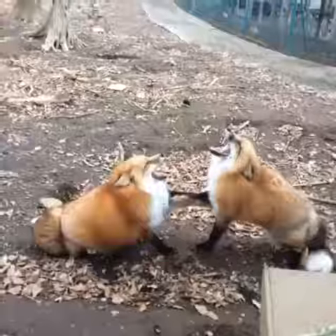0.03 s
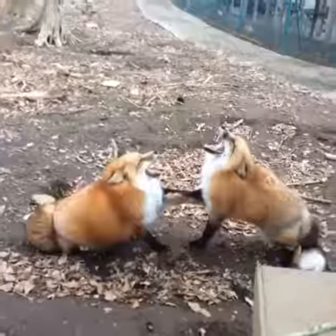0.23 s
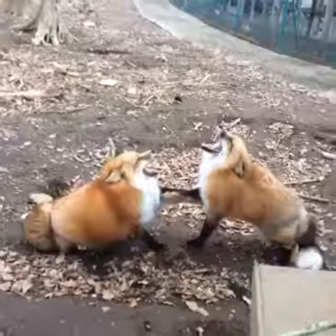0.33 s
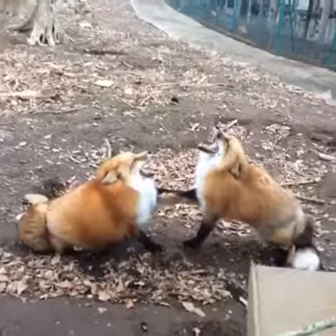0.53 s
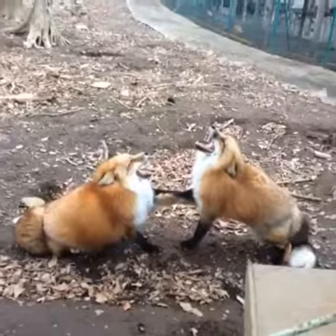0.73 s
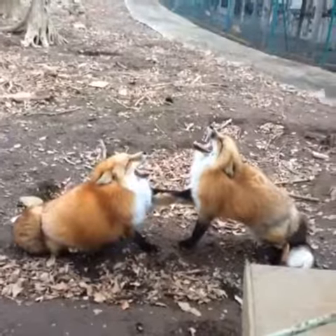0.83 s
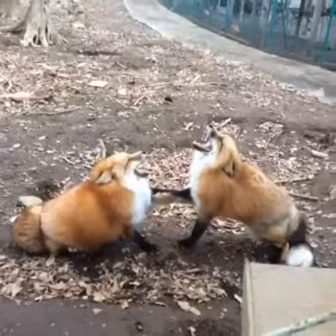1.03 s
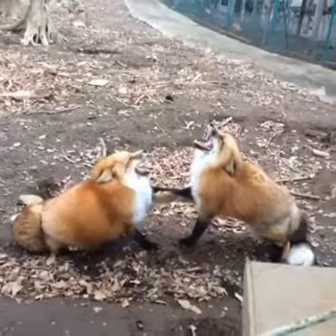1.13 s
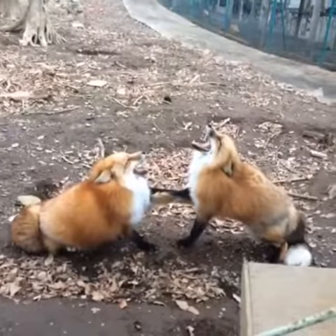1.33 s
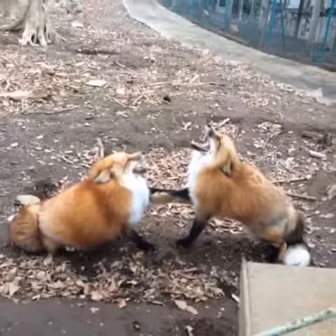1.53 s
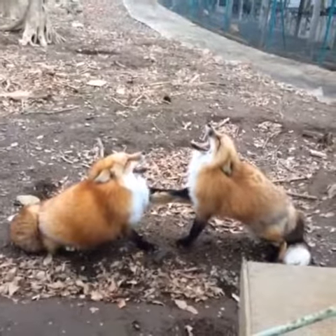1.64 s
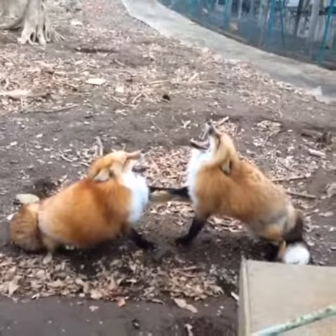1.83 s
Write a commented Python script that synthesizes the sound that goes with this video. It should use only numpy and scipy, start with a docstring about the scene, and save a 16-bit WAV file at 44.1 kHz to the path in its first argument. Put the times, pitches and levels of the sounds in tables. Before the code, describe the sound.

Two foxes scream, rasp and whine harshly at each other, close by outdoors.

```python
"""Two foxes quarrel face to face in an outdoor pen, close to a single microphone.
One rasps, forcing air through a wide open throat, while a wavering whine runs through it twice,
at times with a second tone. At the peaks of effort the voices break into harsh screams, and the
last whine ends in a growl. Jaws or dry twigs click and paws thud on the soil; fence and trees
give a short echo, and a low hum lies in the distance."""
import sys
import numpy as np
from scipy import signal
from scipy.fft import rfft, irfft, next_fast_len
from scipy.io import wavfile

SR = 44100
rng = np.random.default_rng(int(sys.argv[2]) if len(sys.argv) > 2 else 0)


def store_pcm(level_fs):
    """Save levels as 16-bit WAV."""
    pcm = np.round(np.clip(level_fs, -1, 1) * 32767).astype(np.int16)
    wavfile.write(sys.argv[1], SR, np.atleast_2d(pcm).T)


N = 83790
T = np.arange(N) / SR

# The rasping fox, close up: time_s, ring_db, air_db
RASP_LEVELS = [(.151, -45, -42), (.25, -36.5, -34.5), (.292, -32.5, -34.5), (.318, -40, -30),
               (.36, -39.5, -31), (.41, -39, -32.5), (.5, -33.5, -35.5), (.54, -45.5, -37.5),
               (.59, -30.5, -48), (.645, -36, -34), (.697, -32, -36.5), (.718, -46, -39.5), (.8, -36, -40),
               (.925, -33, -40), (.965, -35.5, -37.5), (1.0, -38.5, -40.5), (1.06, -33.5, -38),
               (1.1, -42, -41), (1.125, -36.5, -37.5), (1.2, -40, -45), (1.3, -73, -45), (1.36, -49, -83),
               (1.52, -67, -65)]
# Resonances of its open throat: centre_hz, width_hz, gain_db
THROAT_RESONANCES = [(869, 28, 4), (1098, 50, 2.5), (1288, 51, 3), (1442, 42, 2.5), (1570, 57, 3),
                     (1734, 98, 3), (1892, 186, 5), (2165, 126, -1), (2318, 277, -1.5), (5410, 440, -15)]
# Its rushing breath: frequency_hz, gain_db
BREATH_SPECTRUM = [(200, -67), (400, -14.5), (560, -5.5), (760, -5.5), (1000, 1.5), (1900, 1.5),
                   (2700, -12), (3600, -19.5), (4000, -18), (4600, -15), (6500, -18.5), (8300, -22.5),
                   (9500, -19), (11000, -29.5), (14000, -29)]
def rasp(flutter_hz=460, flutter_db=0.5):
    """Irregular puffs of air ring the fixed, steep-sided resonances of the open throat."""
    def throat(hz):
        return sum(amp(db) * resonance(hz, centre, width) for centre, width, db in THROAT_RESONANCES)
    puffs = amp(flutter_db * wobble(flutter_hz))
    ring = unit(filtered(puffs * rng.standard_normal(N), throat))
    breath = noise(BREATH_SPECTRUM, puffs)
    ring_db, air_db = curves(RASP_LEVELS)
    return sounding(RASP_LEVELS) * (amp(ring_db) * ring + amp(air_db) * breath)


# Two close whines, and four tones beside them: time_s, pitch_hz, fundamental_db, overtones_db
FIRST_WHINE = [(.151, 623, -33.5, -36.5), (.2, 555, -39, -41), (.26, 488, -38.5, -40.5),
               (.305, 596.3, -38.5, -44), (.337, 635, -36.5, -48), (.355, 560.3, -36, -46),
               (.385, 528, -36.5, -42), (.42, 444.2, -39.5, -62), (.47, 455, -43.5, -62),
               (.52, 483.7, -39.5, -37), (.555, 556.5, -37.5, -34), (.59, 481.3, -37.5, -37),
               (.62, 456, -45, -63), (.645, 415, -57, -57)]
LAST_WHINE = [(1.036, 719.5, -38.5, -53), (1.05, 569.6, -39, -27), (1.078, 456.7, -40, -36),
              (1.104, 436.3, -50, -52), (1.135, 458.4, -47.5, -35.5), (1.164, 507.3, -50, -37),
              (1.214, 522, -39, -31), (1.255, 491.6, -40.5, -35), (1.29, 447.4, -38.5, -37.5),
              (1.32, 491.6, -69, -35.5), (1.346, 521.8, -44, -40), (1.371, 537, -44, -34.5),
              (1.405, 502.3, -36, -37), (1.447, 476, -48.5, -33.5), (1.486, 545.2, -40.5, -38),
              (1.526, 558, -39.5, -36), (1.55, 525.4, -36.5, -36.5), (1.573, 488, -37, -42)]
SIDE_TONES = [
    [(.19, 826, -38, -57), (.225, 797, -41.5, -53), (.247, 736, -35.5, -57), (.275, 732, -43, -52)],
    [(.345, 880, -50, -57), (.388, 792, -31.5, -58), (.415, 666.5, -34.5, -53), (.44, 668, -32.5, -48),
     (.475, 684, -37.5, -58), (.505, 755, -43, -56)],
    [(.575, 596, -52, -44), (.61, 568, -40.5, -56), (.638, 557, -35, -42), (.655, 550, -74, -56)],
    [(1.17, 511, -49, -50), (1.24, 504.9, -63, -55), (1.31, 485.9, -43, -38.5), (1.39, 485, -46, -43),
     (1.46, 466.3, -35.5, -41.5), (1.51, 452.9, -41, -51), (1.558, 476.2, -36, -56), (1.578, 420, -41, -52)],
]
# The mouth's shape at a pitch of mouth_hz, and the air in the whine: frequency_hz, gain_db
MOUTH_RESPONSE = [(800, -21.5), (1100, 0), (1550, -13.5), (2000, -20), (2450, -16), (2850, -23),
                  (3300, -27), (4400, -37), (5100, -23.5), (5500, -27.5), (6000, -22), (7000, -35.5),
                  (9500, -37.5)]
WHINE_AIR_SPECTRUM = [(200, -42), (600, -41), (850, -13), (1150, 16.5), (1750, -23), (2500, 7), (3200, -7),
                      (4100, -13.5), (5200, -24), (6400, -5), (8000, -20), (9700, -19), (14000, -28)]
def whine(rows, mouth_hz=566, mouth_follow=0.34, bright_hz=520, crack_hz=498.4, strain_db=-32.5):
    """An unsteady tone with overtones shaped by the mouth; it squeals when high and cracks when low."""
    jitter_hz, shimmer_hz, flicker_hz = 210, 380, 38
    pitch, fundamental_db, overtones_db = curves(rows)
    phase = 2 * np.pi * np.cumsum(pitch * (1 + .009 * wobble(jitter_hz))) / SR
    dull_db = -.3 * np.maximum(bright_hz - pitch, 0)
    spacing = pitch * (mouth_hz / pitch) ** mouth_follow  # the resonances partly follow the pitch
    offsets = rng.uniform(0, 2 * np.pi, size=20)
    overtones = []
    for k in range(2, 20):
        flicker_db = 5 * wobble(flicker_hz) * (k > 2)
        gain = amp(along(MOUTH_RESPONSE, k * spacing) + dull_db * (k > 7) + flicker_db)
        hoarseness = .05 * k * wobble(shimmer_hz)
        overtones.append(gain * np.sin(k * phase + offsets[k] + hoarseness))
    second, *upper = overtones
    # As the pitch sags, a tone appears between the first two harmonics.
    crack = np.clip((crack_hz - pitch) / 30, 0, 1) * np.sin(1.5 * phase + wobble(jitter_hz))
    air = amp(-11) * noise(WHINE_AIR_SPECTRUM, 1 + .5 * np.cos(phase))
    # Above strain_db, extra effort goes mostly into the second harmonic.
    upper_gain = amp(-0.59 * np.maximum(overtones_db - strain_db, 0))
    edge = second + upper_gain * (sum(upper) + air) + amp(-9.5) * crack
    voice = amp(fundamental_db) * np.sin(phase) + amp(overtones_db) * edge
    shimmer = amp(wobble(shimmer_hz))
    return np.sqrt(2) * voice * shimmer * sounding(rows)


# Screams at the peaks of effort: start_s, length_s, body_db, hiss_db
SCREAMS = [(0.111, 0.08, -33.5, -35.5), (0.188, 0.045, -34, -37), (0.34, 0.036, -37.5, -35),
           (0.387, 0.059, -32.5, -55), (0.458, 0.1, -34.5, -72), (0.552, 0.072, -34, -68)]
# Their colour from the throat and from the teeth: frequency_hz, gain_db
SCREAM_BODY_SPECTRUM = [(200, -19), (350, -20), (480, -14), (700, 5), (1100, 1.5), (1450, 3.5), (1850, 2.5),
                        (2300, -17), (3000, -18), (6000, -21.5), (14000, -25.5)]
SCREAM_HISS_SPECTRUM = [(500, -32), (1600, -8), (2150, 4.5), (2480, -2), (2900, 3.5), (3400, 7),
                        (4000, -4.5), (4600, -1.5), (5300, -5.5), (5900, 1.5), (7000, -14), (8300, -16),
                        (9600, -20), (11500, -35), (13500, -23)]
def screams(attack_s=0.012, fall_db_per_s=356, flutter_hz=370, flutter_db=2):
    """The voice breaks into chaotic flutter: a throaty body and a hiss between the teeth."""
    flutter = amp(flutter_db * wobble(flutter_hz))
    body, hiss = np.zeros(N), np.zeros(N)
    for start, length, body_db, hiss_db in SCREAMS:
        attack = np.clip((T - start) / attack_s, 0, 1)
        envelope = attack * amp(-fall_db_per_s * np.maximum(T - start - length, 0))
        body = np.hypot(body, amp(body_db) * envelope)
        hiss = np.hypot(hiss, amp(hiss_db) * envelope)
    return body * noise(SCREAM_BODY_SPECTRUM, flutter) + hiss * noise(SCREAM_HISS_SPECTRUM, flutter)


# Squeals within the rasp and screams: start_s, end_s, start_hz, end_hz, level_db
SQUEALS = [(0.151, 0.184, 2545, 2348, -31.5), (0.154, 0.249, 2140, 2125, -38.5),
           (0.162, 0.343, 1339, 1281, -34.5), (0.265, 0.305, 1545, 1580, -29.5),
           (0.288, 0.32, 1166, 1220, -28.5), (0.543, 0.558, 1090, 1115, -36),
           (0.35, 0.396, 985.5, 912, -32), (0.371, 0.412, 1616, 1437, -35), (0.388, 0.417, 1270, 1325, -33),
           (0.409, 0.453, 1127, 1102, -28.5), (0.454, 0.55, 1460, 1452, -32.5),
           (0.559, 0.619, 1868, 1690, -32), (0.657, 0.712, 1447, 1457, -34.5),
           (0.753, 0.978, 880, 864, -50), (0.695, 0.983, 560, 575.5, -57.5),
           (0.768, 0.985, 1066, 1045, -48.5), (1.176, 1.32, 2445, 2444, -41.5)]
def squeals(flutter_hz=260, wander_hz=13, shimmer_db=2):
    """Thin fluttering tones glide and stand out of the rasp."""
    out = np.zeros(N)
    for start, end, start_hz, end_hz, db in SQUEALS:
        glide = [(start, start_hz), (end, end_hz)]
        pitch = curves(glide)[0] + wander_hz * wobble(flutter_hz)
        envelope = amp(db + shimmer_db * wobble(flutter_hz)) * sounding(glide)
        out += envelope * np.sin(2 * np.pi * np.cumsum(pitch) / SR)
    return out


# The growl that ends the last whine: time_s, level_db
GROWL_LEVELS = [(1.533, -37.5), (1.556, -33.5), (1.59, -33), (1.62, -40), (1.648, -50)]
# The growling throat: frequency_hz, gain_db
GROWL_SPECTRUM = [(280, -18), (620, 6), (1100, 0), (1850, -5.5), (2500, -17), (4800, -22), (5900, -16.5),
                  (7000, -24), (14000, -29.5)]
def growl(puff_hz=125, unevenness=.25, fall_db=16):
    """Slack vocal folds flap unevenly; every puff rings the throat and dies."""
    cycle = np.cumsum(puff_hz * np.exp(unevenness * wobble(puff_hz))) / SR % 1
    puffs = noise(GROWL_SPECTRUM, amp(-fall_db * cycle))
    return amp(curves(GROWL_LEVELS)[0]) * sounding(GROWL_LEVELS) * puffs


# Thin shrieks in the rasp: start_s, end_s, level_db
SHRIEKS = [(0.801, 0.962, -49.5), (1.101, 1.162, -47.5)]
def shriek(centre_hz=4540, width_hz=390):
    """As the lips draw back, air rings one narrow, high resonance of the mouth."""
    envelope = sum(amp(db) * sounding([[start], [end]]) for start, end, db in SHRIEKS)
    ring = filtered(rng.standard_normal(N), lambda hz: resonance(hz, centre_hz, width_hz))
    return envelope * unit(ring)


# Fine spray at the peak of the scream: time_s, level_db
SPIT_LEVELS = [(.34, -56.5), (.365, -47), (.5, -47.5)]
def spit():
    """A burst of very high hiss between the teeth."""
    return amp(curves(SPIT_LEVELS)[0]) * sounding(SPIT_LEVELS) * noise([(4000, -36), (9500, 2)])


# Clicks near the microphone: time_s, level_db, t60_s, ring_hz
SNAPS = [(1.012, -20.5, 0.0046, 2130), (1.0132, -30, 0.01, 3880), (1.0332, -26, 0.024, 1720),
         (1.0366, -28, 0.011, 4250), (1.6545, -42, 0.0054, 2920), (1.891, -37.5, 0.01, 2200),
         (1.8935, -36.5, 0.01, 3870)]
# Their noisy crack: frequency_hz, gain_db
CRACK_SPECTRUM = [(300, -12), (900, 1.5), (1700, 0), (2900, -4), (4300, -3.5), (5500, -13), (9000, -25),
                  (14000, -42)]
def snaps(bass_cut_hz=430):
    """Jaws or dry twigs crack and ring briefly, too small to radiate bass."""
    crack = amp(-1.5) * noise(CRACK_SPECTRUM)
    clicks = np.zeros(N)
    for start, db, t60, ring_hz in SNAPS:
        age = T - start
        decay = (age >= 0) * np.exp(-np.log(1000) * np.abs(age) / t60)
        clicks += amp(db) * decay * (crack + np.sin(2 * np.pi * ring_hz * age))
    return filtered(clicks, lambda hz: (1j * hz / (bass_cut_hz + 1j * hz)) ** 2)


# Footfalls on the floor of the pen: start_s, level_db
PAW_FALLS = [(0.177, -39.5), (0.633, -45.5), (0.678, -48)]
# The soil's dull note: frequency_hz, gain_db
SOIL_SPECTRUM = [(40, -50), (120, -10), (190, -0.5), (260, -11.5), (400, -21), (1500, -64)]
def paws(rise_s=0.0046):
    """Paws land on soil, each a low thud that swells and dies quickly."""
    envelope = np.zeros(N)
    for start, db in PAW_FALLS:
        rise = np.maximum(T - start, 0) / rise_s
        envelope += amp(db) * rise * np.exp(1 - rise)
    return envelope * noise(SOIL_SPECTRUM)


# Decay of the pen around the microphone: frequency_hz, t60_s
PEN_DECAY = [(200, 0.31), (1200, 0.26), (5000, 0.46), (14000, 0.054)]
def pen_echo(x):
    """A short scattered echo from fence and trees, the highest treble dying first."""
    hz, t, spectra = signal.stft(rng.standard_normal(SR // 2), SR, nperseg=256)
    decay = np.exp(-np.log(1000) * t / along(PEN_DECAY, hz)[:, None])
    tail = signal.istft(spectra * decay, SR, nperseg=256)[1]
    return signal.fftconvolve(x, tail / np.linalg.norm(tail))[:N]


# Swells of the distant hum: time_s, gain_db
HUM_SWELLS = [(.15, 2.5), (1.2, 6.5), (1.4, -2), (1.62, 8.5), (1.72, -6.5), (1.9, -0.5)]
# The hum, and the open air beyond the pen: frequency_hz, gain_db
HUM_SPECTRUM = [(25, -77), (60, -21), (110, -16), (155, -1), (195, 0), (240, -19.5), (300, -11.5),
                (380, -30), (1500, -37)]
OPEN_AIR_SPECTRUM = [(30, 22), (300, 19.5), (1100, 13), (2500, 2), (6000, -3), (14000, -22)]
def background(hum_db=-58.5, air_db=-64):
    """A low wavering hum far off, and faint open-air noise."""
    swell_db, = curves(HUM_SWELLS)
    return amp(hum_db + swell_db) * noise(HUM_SPECTRUM) + amp(air_db) * noise(OPEN_AIR_SPECTRUM)


def amp(db):
    """Decibels to gain."""
    return 10 ** (np.asarray(db) / 20)


def unit(x):
    """Scale to rms 1."""
    return x / np.sqrt(np.mean(x ** 2) + 1e-20)


def along(points, hz):
    """Interpolate (frequency_hz, value) points on a log frequency axis."""
    frequencies, values = np.transpose(points)
    return np.interp(np.log(hz + 1), np.log(frequencies + 1), values)


def curves(rows):
    """One value per sample for each column after the time."""
    times, *columns = np.transpose(rows)
    return [np.interp(T, times, column) for column in columns]


def sounding(rows, fade_s=0.0031):
    """1 from the first row's time to the last, fading outside."""
    return np.exp(-(np.maximum(rows[0][0] - T, 0) + np.maximum(T - rows[-1][0], 0)) / fade_s)


def wobble(rate_hz):
    """A smooth random curve with rate_hz knots a second."""
    knots = rng.standard_normal(N // 32)
    return signal.resample_poly(knots, 32, 1)[(T * rate_hz * 32).astype(int) % N]


def resonance(hz, centre, width):
    """Steep-sided response of two identical band-passes in series."""
    return (1j * hz * width / (centre ** 2 - hz ** 2 + 1j * hz * width)) ** 2


def filtered(x, response):
    """Filter x by a complex response of frequency."""
    size = next_fast_len(N + SR // 2)
    return irfft(rfft(x, size) * response(np.fft.rfftfreq(size, 1 / SR)), size)[:N]


def noise(spectrum, gate=1):
    """Gated white noise, coloured, at rms 1."""
    return unit(filtered(gate * rng.standard_normal(N), lambda hz: amp(along(spectrum, hz))))


def scene(echo_db=-13.5):
    """Both foxes close up, the pen's echo around them and the hum behind, in mono."""
    whines = sum(whine(rows) for rows in [FIRST_WHINE, LAST_WHINE, *SIDE_TONES])
    foxes = whines + rasp() + shriek() + squeals() + screams() + growl() + spit() + snaps() + paws()
    return (foxes + amp(echo_db) * pen_echo(foxes) + background())[None]


# The highest treble falls away steeply above about 14 kHz: frequency_hz, gain_db
TREBLE_LOSS = [(13900, -0.5), (14600, -23), (15700, -24)]
def record(dry, start_s=.151, top_hz=15700):
    """The sound starts abruptly; the highest treble falls away to the band limit."""
    gated = dry[0] * (T >= start_s)
    return filtered(gated, lambda hz: amp(along(TREBLE_LOSS, hz)) * (hz < top_hz))[None]


dry = scene()
out = record(dry)
store_pcm(out)
```